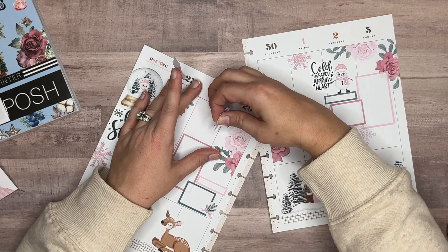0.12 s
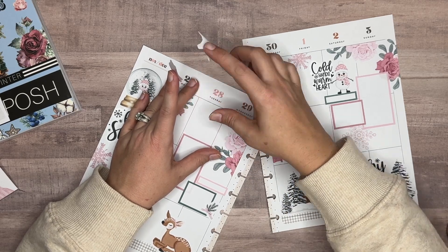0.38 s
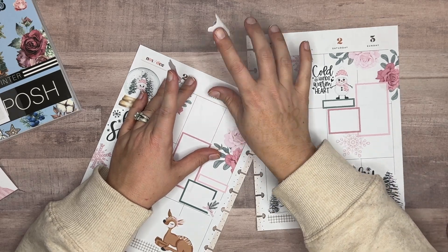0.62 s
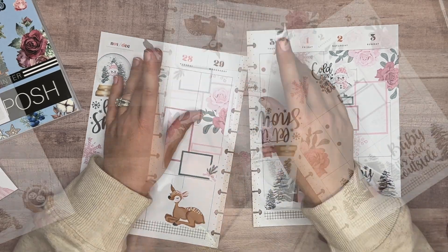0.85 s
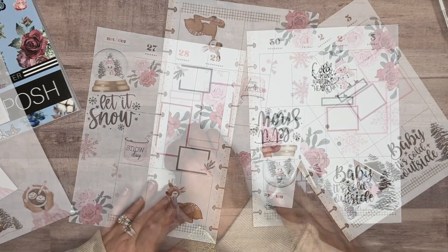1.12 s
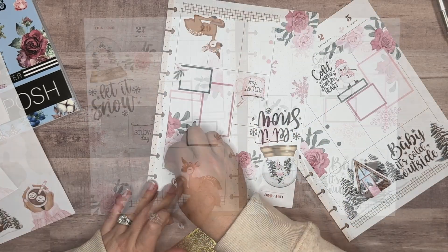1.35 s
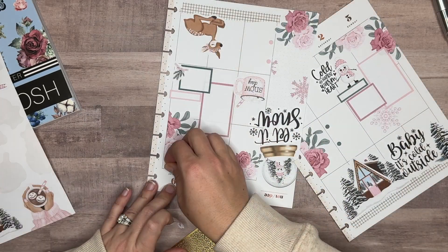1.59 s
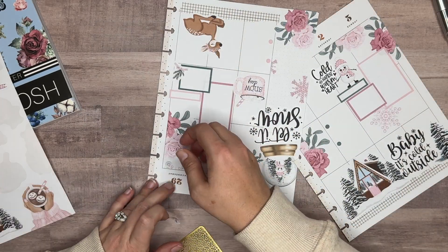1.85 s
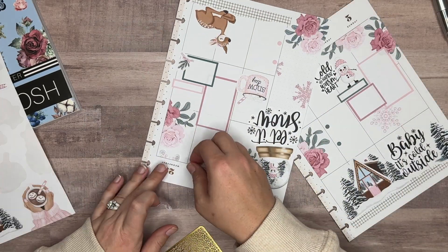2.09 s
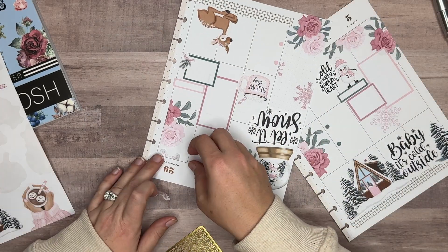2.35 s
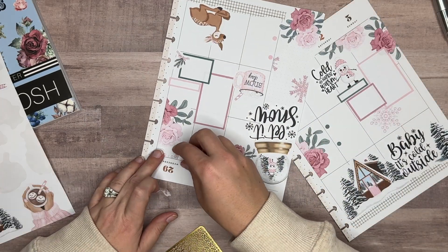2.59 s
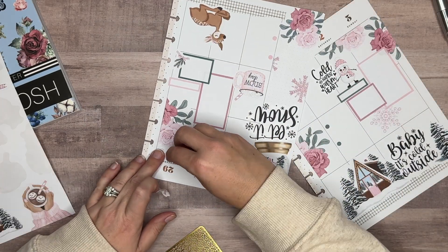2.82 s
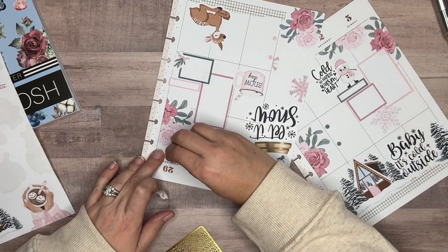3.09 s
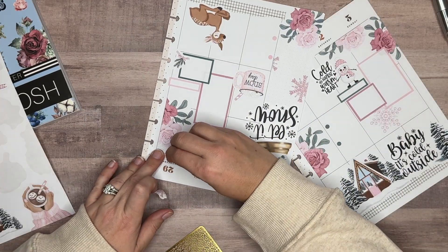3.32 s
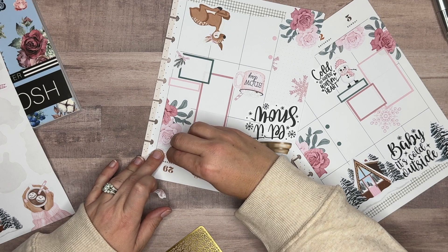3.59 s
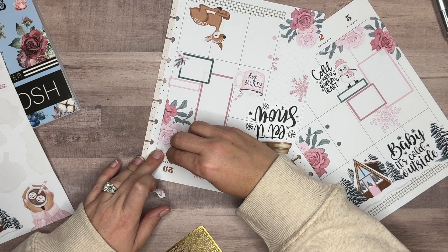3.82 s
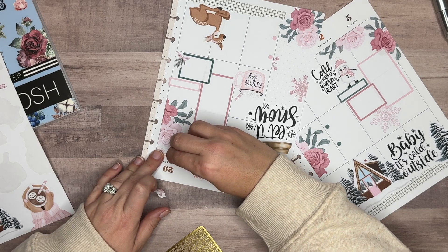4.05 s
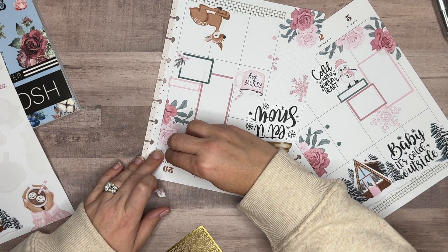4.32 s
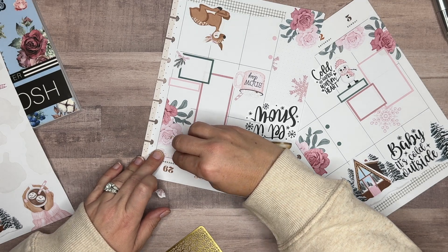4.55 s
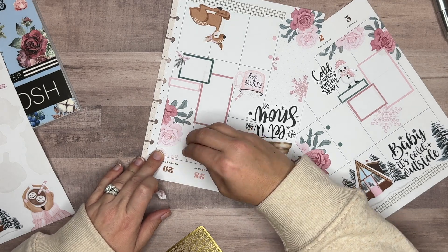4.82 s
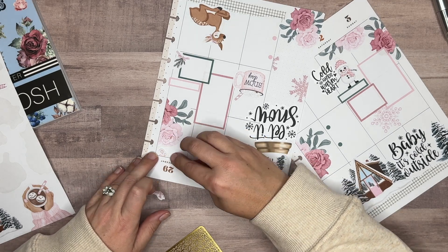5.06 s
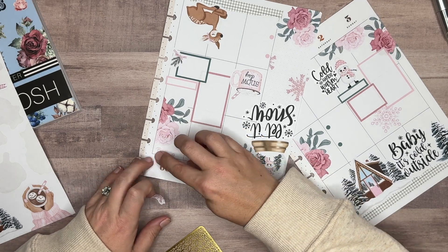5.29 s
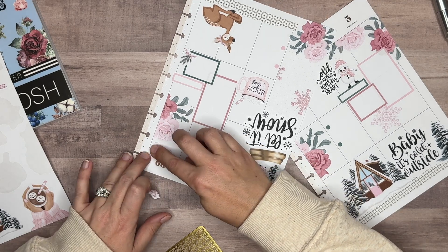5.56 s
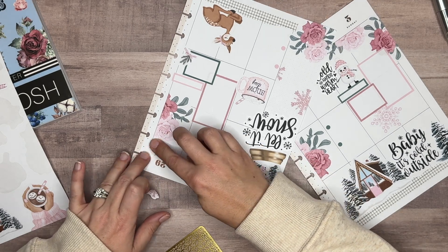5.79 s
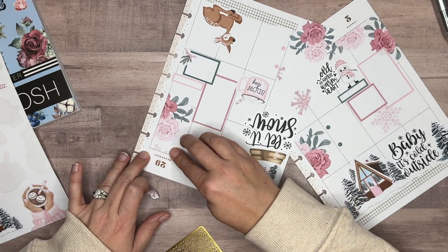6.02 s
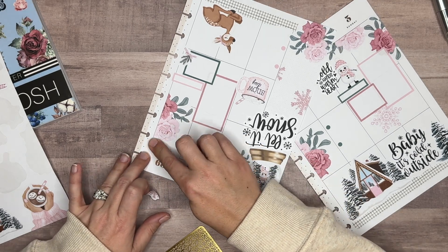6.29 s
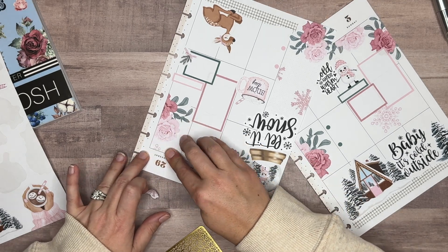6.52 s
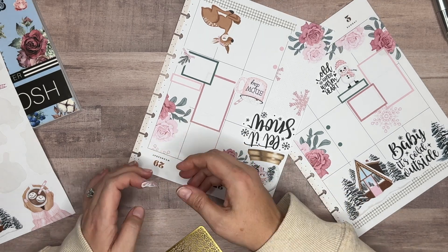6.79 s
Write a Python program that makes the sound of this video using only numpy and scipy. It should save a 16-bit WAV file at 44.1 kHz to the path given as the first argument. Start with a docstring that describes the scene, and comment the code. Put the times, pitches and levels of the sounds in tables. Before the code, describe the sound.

Fingers peel and press stickers on paper pages: one loud snap, soft rustles, faint clicks, then firmer thumps and drags above quiet ventilation rumble.

```python
"""A sharp glue snap comes first, amid skin hissing over paper: fingers peel, slide and press stickers on pages.
The pages lie on a wooden table. Snaps are short spikes with fizz, repeated by near surfaces; knocks are decaying
table modes; slides and drags are shaped noise that swells and fades. Below them sit a low ventilation rumble,
a mains hum and a faint high whine. A two-port microphone hears it all."""
import sys
import numpy as np
from scipy import signal
from scipy.fft import rfft, irfft, next_fast_len
from scipy.io import wavfile
from scipy.ndimage import uniform_filter1d, map_coordinates

SR = 44100
rng = np.random.default_rng(int(sys.argv[2]) if len(sys.argv) > 2 else 0)


def pcm_store(signal):
    """Save signal as 16-bit PCM."""
    levels = np.round(np.clip(np.atleast_2d(signal), -1, 1) * 32767)
    wavfile.write(sys.argv[1], SR, levels.astype(np.int16).T)


def gain_from_decibels(decibels):
    """Convert decibel values to linear amplitude factors."""
    exponent = np.asarray(decibels, float) / 20
    return 10 ** exponent


N = 304290  # samples, 6.9 s


def unit(x):
    """Scales a signal to rms 1."""
    return x / np.sqrt(np.mean(x ** 2) + 1e-20)


def along(points, hz):
    """Reads a curve of (frequency, value) points on a log frequency axis."""
    f, v = np.transpose(points)
    return np.interp(np.log(hz + 1), np.log(f + 1), v)


def wobble(rate):
    """Draws a smooth random curve with rate knots a second."""
    knots = rng.standard_normal(int(N * rate / SR) + 4)
    return map_coordinates(knots, [np.arange(N) * rate / SR])


def filtered(x, response):
    """Filters x by a (possibly complex) response of frequency."""
    m = next_fast_len(x.shape[-1] + 8192)
    spectrum = rfft(x, m) * response(np.fft.rfftfreq(m, 1 / SR))
    return irfft(spectrum, m)[..., :x.shape[-1]]


def level(x, low_hz, high_hz):
    """Scales x so that its band from low_hz to high_hz has rms 1."""
    return x / np.std(filtered(x, lambda hz: (hz > low_hz) & (hz < high_hz)))


def resonance(f, hz, width_hz):
    """One causal resonance, gain 1 at its top."""
    return 1j * f * width_hz / (hz * hz - f * f + 1j * f * width_hz)


def lead(turns):
    """Phase offset between ports: left earlier, right later, by half the turns each."""
    return np.exp(1j * np.pi * turns * [[1], [-1]])


# tone colour of the ventilation: frequency_hz, level_db (relative)
RUMBLE_COLOUR = [(20, -31), (43, -2), (68, -11), (105, -0.5), (132, -4.5), (153, 2), (185, -18.5),
                 (220, -14.5), (270, -22.5), (700, -29.5), (1150, -36.5), (1600, -38.5), (2300, -50.5),
                 (3500, -58), (15200, -58), (15500, -85.5)]
# left-right likeness of the rumble: frequency_hz, likeness (0 unrelated, 1 identical)
RUMBLE_LIKENESS = [(20, 1), (45, 0.97), (100, 0.99), (200, 0.91), (400, 0.9), (700, 0.1), (1300, 0.03),
                   (2400, 0.41), (4000, 0.95), (5000, 0.97)]


def rumble():
    """Ventilation from all around: coloured noise, its mid and side shares set by the left-right likeness."""
    def spread(hz):
        return np.arccos(np.clip(along(RUMBLE_LIKENESS, hz), -1, 1)) / 2

    def mid_side(hz):
        return gain_from_decibels(along(RUMBLE_COLOUR, hz)) * [np.cos(spread(hz)), np.sin(spread(hz))]

    mid, side = filtered(rng.standard_normal((2, N)), mid_side)
    gain = gain_from_decibels(-52 + 0.68 * wobble(4.8))  # dB rms, gently wavering
    return gain * unit(np.array([mid + side, mid - side]))


# mains hum: pitch_hz, level_db (rms, before a slow waver)
MAINS_HUM = (120, -54)


def hum():
    """The mains hum: one sine whose level and phase waver slowly."""
    pitch_hz, level_db = MAINS_HUM
    gain = gain_from_decibels(level_db + 1.5 * wobble(2.2)) * np.sqrt(2)
    phase = 2 * np.pi * pitch_hz * np.arange(N) / SR
    return gain * np.sin(phase + .3 * wobble(3.3))


# the whine steps up a little in pitch and level: time_s, pitch_hz, level_db (rms, before a waver)
WHINE_STEP = [(1.15, 14718, -88), (1.4, 14728, -84)]


def whine():
    """A thin high sine that glides between two pitches, wavering in level and phase."""
    t = np.arange(N) / SR
    time_s, pitch_hz, level_db = np.transpose(WHINE_STEP)
    gain = gain_from_decibels(np.interp(t, time_s, level_db) + 0.57 * wobble(6.7)) * np.sqrt(2)
    phase = 2 * np.pi * np.cumsum(np.interp(t, time_s, pitch_hz)) / SR
    return gain * np.sin(phase + .5 * wobble(8.3))


# decay of the room: frequency_hz, t60_s
ROOM_DECAY = [(300, 0.52), (2000, .16), (8000, 0.18), (16000, 0.033)]


def room(x):
    """Noise tails in which each frequency dies at its own speed; a new tail for every quarter second of sound."""
    out, step = np.zeros(N + SR), SR // 4
    for start in range(0, N, step):
        hz, t, z = signal.stft(rng.standard_normal(SR // 3), SR, nperseg=256)
        fade = gain_from_decibels(-60 * t / along(ROOM_DECAY, hz)[:, None])
        tail = signal.istft(z * fade, SR, nperseg=256)[1]
        wet = signal.fftconvolve(x[start:start + step], tail / np.linalg.norm(tail))
        out[start + 130:][:len(wet)] += wet  # 130 samples, about 3 ms of pre-delay
    return out[:N]


def grit(depth_db, rate):
    """Friction noise: white noise in uneven bursts, plus a slower level flicker."""
    return rng.standard_normal(N) * gain_from_decibels(depth_db * wobble(rate) + 1.6 * wobble(40))


def strokes(rows):
    """Gain curves of a stroke's two layers: swell to the peak, then fade; overlapping strokes add in power."""
    edge_db = 20    # drop one rise before and one fall after the peak
    roundness = 1.355  # shape of the top: 1 pointed, 2 bell
    t, power = np.arange(N) / SR, np.zeros((2, N))
    for peak_s, rise_s, fall_s, level_db, second_db in rows:
        first = max(round((peak_s - 2 * rise_s) * SR), 0)
        near = slice(first, round((peak_s + 2 * fall_s) * SR))
        before, after = (peak_s - t[near]) / rise_s, (t[near] - peak_s) / fall_s
        away = np.where(t[near] < peak_s, before, after)
        power[:, near] += gain_from_decibels(level_db - edge_db * away ** roundness + [[0], [second_db]]) ** 2
    return np.sqrt(power)


# modes of the table top: pitch_hz, level_db (relative), t60_s (when knocked)
TABLE_MODES = [(116.8, 9, 0.063), (168.4, -7.5, 0.11), (204, -6, 0.081), (325, 0.5, 0.067), (386, -6, 0.12),
               (552.2, -1.5, 0.028), (680, 0, 0.053), (986, -10, 0.013), (1654, -4, 0.024),
               (2216, -7, 0.061)]
# a fingertip presses and drags on the table top:
# peak_s, rise_s, fall_s, drag_level_db, scrape_level_db (against the drag)
TABLE_PRESSES = [(.045, 0.085, 0.051, -73, -1), (.1, 0.059, 0.031, -60.5, -21),
                 (.16, 0.13, 0.086, -85.5, 11.5), (.42, 0.089, 0.045, -74, -9.5),
                 (.52, 0.028, 0.2, -62, -14), (.63, 0.18, .15, -61, -17), (.86, 0.15, 0.11, -67.5, 2.5),
                 (1.03, .25, 0.25, -72, -2.5), (1.52, .07, .1, -71, -15), (1.656, .1, .08, -66, -14),
                 (1.868, 0.022, .05, -76.5, -3), (2.1, 0.14, 0.2, -79, -1.5), (2.43, 0.058, .15, -79, -5),
                 (2.74, 0.11, 0.18, -66.5, -14), (4.47, 0.027, 0.081, -70.5, -18),
                 (4.53, 0.079, 0.11, -66.5, -19), (4.595, 0.095, 0.04, -59.5, -11),
                 (4.69, 0.054, 0.082, -72.5, -10), (4.933, .07, .1, -76, -6.5),
                 (5.068, .06, 0.082, -75.5, -10.5), (5.16, 0.015, 0.048, -78, 9),
                 (5.26, 0.094, 0.12, -55, -22), (5.384, 0.043, 0.041, -62.5, -13),
                 (5.52, .07, .1, -61, -11), (5.595, 0.072, 0.033, -52, -5.5),
                 (5.67, 0.07, 0.092, -59.5, -18.5), (5.83, 0.027, .12, -72, -7),
                 (5.94, 0.09, 0.085, -61, -1), (6.17, 0.13, .1, -72.5, -9),
                 (6.266, 0.034, 0.086, -57, -11.5), (6.41, .03, 0.14, -67, -4.5),
                 (6.537, 0.18, 0.14, -69.5, -3)]


def drags():
    """Stick-slip on wood: coarse noise excites the table's modes, the low ones as drag, the top two as scrape."""
    def wood(modes):
        def response(f):
            total = 0
            for k, (hz, level_db, t60) in enumerate(modes):
                gain = (-1) ** k * gain_from_decibels(level_db) * (hz / 690) ** .35
                total = total + gain * resonance(f, hz, 2.5 / t60 + .09 * hz)  # broader than when knocked
            return total
        return response

    drag = level(filtered(grit(2, 120), wood(TABLE_MODES[:-2])), 300, 1100)
    scrape = level(filtered(grit(2, 120), wood(TABLE_MODES[-2:])), 1400, 2600)
    return np.sum(strokes(TABLE_PRESSES) * [drag, scrape], axis=0)


def patchy(x, depth_db):
    """The page bends under the finger, so its resonances drift: random gain patches, narrow and slow."""
    z = signal.stft(x, nperseg=512)[2]
    field = uniform_filter1d(rng.standard_normal(z.shape), size=4, axis=0)  # across frequency
    field = uniform_filter1d(field, size=24, axis=1)  # across time
    return signal.istft(z * gain_from_decibels(depth_db * unit(field)), nperseg=512)[1][:N]


# tone colour of the paper rustle: frequency_hz, level_db (relative)
PAPER_COLOUR = [(1000, -30), (2000, -11.5), (3100, -6), (3800, -9), (4600, -4.5), (5500, -4), (6500, -7.5),
                (9000, -27.5), (15400, -41)]
# tone colour of the skin hiss: frequency_hz, level_db (relative)
SKIN_COLOUR = [(3500, -30), (6000, -14.5), (7800, -4.5), (9500, -3.5), (12000, -9.5), (14500, -4),
               (15200, -14.5), (15500, -60.5)]
# skin slides over the page: peak_s, rise_s, fall_s, rustle_level_db, hiss_level_db (against the rustle)
PAGE_SLIDES = [(.048, 0.052, 0.059, -67.5, -14), (.1, 0.027, .1, -61, -7.5),
               (.327, 0.053, 0.094, -83.5, 12.5), (.419, 0.049, 0.047, -78.5, 4), (.5, 0.062, .1, -75, 1),
               (.563, 0.092, 0.26, -67.5, 2), (.651, 0.19, 0.042, -75, 10.5), (.8, 0.033, 0.09, -58.5, 3.5),
               (.855, 0.14, 0.07, -54.5, 2.5), (1.03, 0.34, 0.31, -72.5, -5), (1.169, .06, 0.035, -71.5, 2),
               (1.3, 0.18, 0.14, -68.5, 1.5), (1.46, 0.046, 0.07, -89, 0.5),
               (1.556, 0.022, 0.072, -83.5, -8), (1.62, 0.07, 0.046, -85.5, 5),
               (1.72, 0.023, 0.044, -83.5, 12.5), (1.8, 0.12, 0.13, -83.5, 7),
               (1.868, .04, 0.024, -87.5, 13), (1.995, 0.075, 0.23, -72, 0.5),
               (2.165, 0.094, 0.11, -76.5, -1.5), (2.454, 0.041, 0.086, -66, -3),
               (2.6, 0.12, 0.18, -80, -0.5), (2.734, 0.14, 0.19, -80, 2), (3.032, 0.028, 0.055, -90, 20),
               (3.081, 0.058, 0.067, -81, 7), (3.197, .07, 0.072, -92.5, 10), (4.5, 0.028, 0.092, -94, 15),
               (4.59, .1, 0.085, -78, -1), (4.725, 0.051, 0.11, -88, 7.5), (4.769, .08, 0.037, -83.5, -1.5),
               (4.961, .08, .06, -85, 6.5), (5.068, 0.11, 0.09, -96.5, 12), (5.19, 0.031, 0.12, -69, -7),
               (5.27, 0.08, 0.086, -60, 2), (5.38, 0.011, 0.037, -69, 8), (5.49, 0.052, 0.081, -62, 0.5),
               (5.595, 0.071, 0.037, -62.5, -6), (5.7, 0.14, .045, -77.5, 4.5),
               (5.84, 0.029, .12, -78.5, 2.5), (5.94, 0.13, 0.11, -69, -1.5), (6.116, .012, 0.18, -76, 6),
               (6.19, 0.11, 0.056, -74, -2.5), (6.266, .04, 0.06, -70.5, -1),
               (6.412, .012, 0.14, -73.5, -1), (6.5, 0.13, 0.35, -74.5, -0.5),
               (6.661, 0.059, 0.033, -68, 2), (6.8, 0.22, 0.19, -93, 11.5)]


def slides():
    """Dry friction on the page: fine gritty noise, coloured as a paper rustle and a brighter skin hiss."""
    def colour(points):
        return lambda hz: gain_from_decibels(along(points, hz))

    paper = level(filtered(patchy(grit(1.5, 400), 2.4), colour(PAPER_COLOUR)), 3000, 6500)
    skin = level(filtered(patchy(grit(2, 400), 1.8), colour(SKIN_COLOUR)), 6500, 9000)
    return np.sum(strokes(PAGE_SLIDES) * [paper, skin], axis=0)


# above the boom, the mode families body, ring and edge start at: frequency_hz
FAMILY_START = [190, 480, 1300]
# finger knocks: start_s, level_db, then boom_db, ring_db, edge_db (against that level)
FINGER_KNOCKS = [(0.063, -38.5, -19, 0.5, 4), (0.507, -62, -12, -3.5, -9), (0.517, -38.5, 5.5, -22, -20),
                 (0.56, -27.5, -25, -13.5, -26), (0.602, -51, -11.5, -13, -18), (0.865, -45, -7, -5.5, -8),
                 (1.49, -66, 5.5, 10, -23), (1.628, -62.5, -7, -8, 5), (1.635, -48.5, 10.5, 4, -13),
                 (1.863, -62, 15, 9, -12), (4.456, -57, -1, -3, -15), (4.495, -48.5, -7.5, -5, -16),
                 (5.25, -29, 0.5, -0.5, -18), (5.507, -43.5, -13.5, -5, 2.5), (5.576, -48.5, 12.5, 8, 2),
                 (5.607, -52, -31, -6, 2.5), (5.644, -39.5, -0.5, 2.5, -21), (5.923, -50.5, -15, 0.5, -7),
                 (6.107, -54.5, 13, 7, -10), (6.215, -46, -11, -8, -20), (6.227, -46.5, -5, -7, -33),
                 (6.251, -45, 7, 9, -10), (6.401, -58, 14.5, 6.5, -1), (6.519, -53.5, -8, -6, -10)]


def knocks():
    """A fingertip lands; bending waves disperse, so high modes arrive first and low ones about a cycle later."""
    out, t = np.zeros(N + SR), np.arange(SR // 3) / SR
    for start_s, knock_db, boom_db, ring_db, edge_db in FINGER_KNOCKS:
        family_db = [boom_db, 0, ring_db, edge_db]  # the body is the reference
        start = round(start_s * SR)
        for hz, mode_db, t60 in TABLE_MODES:
            scatter_db, detune = rng.normal(0, 1.5), rng.normal(1, .02)
            since = np.maximum(t - .9 / hz, 0)  # seconds since this mode arrived
            fade = gain_from_decibels(-60 * since / t60) * (1 - np.exp(-since * hz / 0.34))
            balance_db = family_db[np.searchsorted(FAMILY_START, hz)] + mode_db
            strength = gain_from_decibels(knock_db + balance_db + scatter_db)
            out[start:][:len(t)] += strength * fade * np.sin(2 * np.pi * hz * detune * since)
    return out[:N]


# tone colour of a crack: frequency_hz, level_db (relative)
CRACK_COLOUR = [(400, -28), (1000, -14.5), (1700, -10), (2700, -5.5), (5500, -6), (8000, -3.5),
                (10000, 8.5), (13000, 12.5), (16000, 16)]
# early reflections of a snap off page, table and hands: delay_s, level_db (both scattered a little)
SNAP_BOUNCES = [(.0008, -2.5), (.0015, -4.5), (.0037, -6.5), (.0054, -12), (.0087, -8.5), (0.0117, -19.5)]
# glue and paper snaps: start_s, level_db (peak of the crack, before scatter and bounces),
# pitch_hz, treble_db (shelf around 9 kHz and up)
GLUE_SNAPS = [(0.0442, -40, 2990, -16), (0.0619, -7, 2728, -26), (0.3174, -68.5, 8900, -6),
              (0.3252, -61.5, 8140, -6), (0.5071, -44.5, 7100, -16), (1.1544, -55, 7480, -20),
              (1.49, -61, 6540, -27), (1.5524, -44, 8450, -22), (1.7119, -46, 7980, -19.5),
              (1.8657, -39.5, 8230, -10), (2.055, -36.5, 4900, -17.5), (2.1132, -56, 3810, -21),
              (2.4114, -59.5, 4410, -13), (2.436, -53, 4320, -13), (2.5726, -58, 7750, -21),
              (3.0224, -56.5, 8320, -7.5), (3.032, -66, 7300, -18), (3.0464, -61, 8220, -10),
              (3.0848, -43, 7200, -11.5), (3.698, -72, 2500, -24.5), (4.4937, -53.5, 6300, -20),
              (4.7243, -60, 4490, -13.5), (4.948, -56.5, 4820, -18), (5.0579, -51.5, 7300, -14.5),
              (5.1587, -52.5, 3170, -10), (5.1826, -54, 3860, -11), (5.251, -36.5, 6760, -30),
              (5.3731, -54.5, 7250, -8.5), (5.4554, -46.5, 5070, -8), (5.506, -36.5, 5500, -20),
              (6.11, -55.5, 8400, -8.5), (6.2557, -48.5, 3130, -21), (6.403, -51, 2770, -25)]


def snaps():
    """Each release is a sharp crack that favours its own pitch, wrapped in fizz and repeated by near surfaces."""
    out, t = np.zeros(N + SR), np.arange(SR // 8) / SR
    arrivals = [(0.00034, 0.00086)] + list(SNAP_BOUNCES)  # the direct crack, then its bounces
    for start_s, level_db, pitch_hz, treble_db in GLUE_SNAPS:
        def tone(f):
            treble = gain_from_decibels(treble_db / (1 + (9000 / (f + 1)) ** 6))
            pitch = .5 + resonance(f, pitch_hz, .5 * pitch_hz)
            return treble * gain_from_decibels(along(CRACK_COLOUR, f)) * pitch

        spike = np.exp(-((t - .0014) / .00002) ** 2)
        fizz_fade = .07 * gain_from_decibels(-60 * t / .015) + .015 * gain_from_decibels(-60 * t / .12)  # a quick and a slow decay
        fizz = rng.standard_normal(len(t)) * fizz_fade * (t > .0006)  # opens just before the spike
        crack = filtered(spike + fizz, tone)
        crack = crack / np.abs(crack).max()
        for (delay_s, bounce_db), scatter in zip(arrivals, rng.normal(0, 1, (7, 2))):
            start = round((start_s + delay_s * (1 + 0.039 * scatter[0])) * SR)
            out[start:][:len(t)] += gain_from_decibels(level_db + bounce_db + scatter[1]) * crack
    return out[:N]


# phase between the two microphone ports below 8 kHz, applied to the snaps: frequency_hz, left_lead_turns
SNAP_PORT_LEAD = [(1700, -0.038), (3400, -0.16), (5900, 0), (7000, 0.051), (8100, 0.064)]


def scene():
    """Hands near the microphone, a little room, the steady background."""
    cracks, blows, friction = snaps(), knocks(), slides() + drags()
    cracks = cracks + gain_from_decibels(-16) * room(cracks)
    cracks = filtered(cracks, lambda hz: lead(along(SNAP_PORT_LEAD, hz)))

    def midrange(hz):
        return 1 / (1 + (hz / 2200) ** 6) / (1 + (350 / (hz + 1)) ** 2)

    walls = filtered(room(blows + friction), midrange)
    walls = gain_from_decibels(-14) * walls * [[1], [-1]]  # opposite sign left and right
    return cracks + blows + friction + walls + rumble() + hum() + whine()


def band_limit(x):
    """A steep low-pass at the top of the band."""
    return signal.sosfilt(signal.butter(12, 16150, fs=SR, output="sos"), x)


# how far the left port leads the right: frequency_hz, left_lead_turns
PORT_LEAD = [(8050, 0), (9550, .5), (11100, 1), (12570, 1.5), (14100, 2), (15600, 2.5)]


def record(dry):
    """Above 8 kHz the two ports swing in and out of phase along frequency, lingering at each extreme."""
    def linger(hz):
        turns = np.interp(hz, *np.transpose(PORT_LEAD))
        return turns - .25 * np.sin(4 * np.pi * turns) / (4 * np.pi)

    mix = filtered(dry, lambda hz: lead(linger(hz)))
    return band_limit(mix)


dry = scene()
out = record(dry)
pcm_store(out)
```